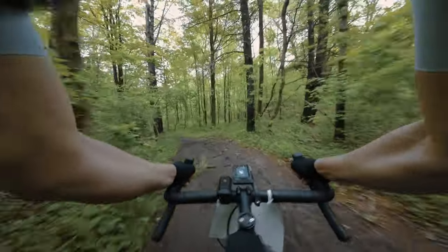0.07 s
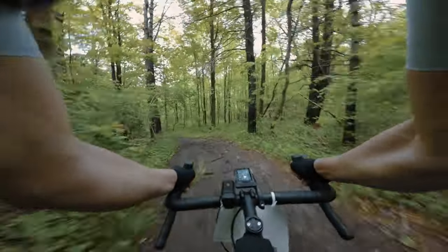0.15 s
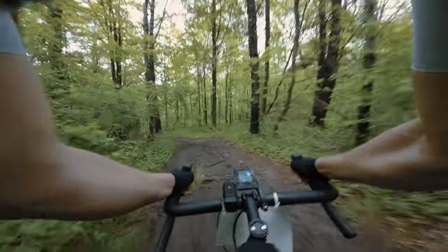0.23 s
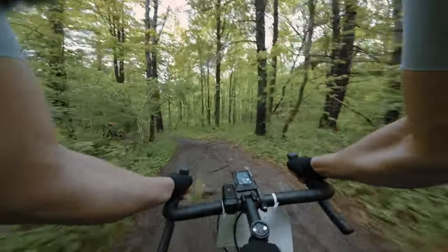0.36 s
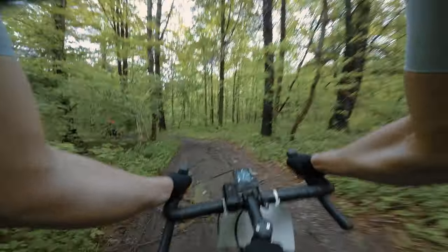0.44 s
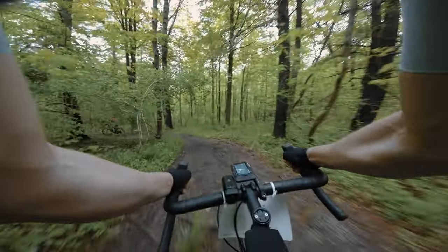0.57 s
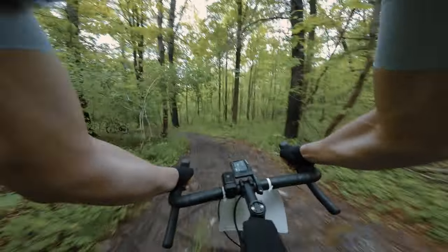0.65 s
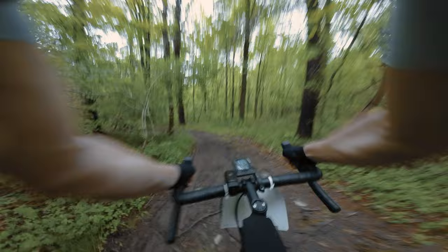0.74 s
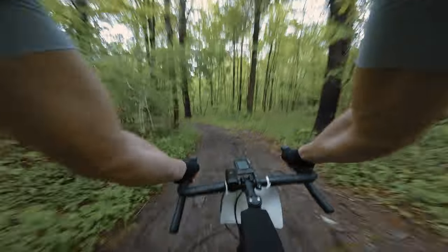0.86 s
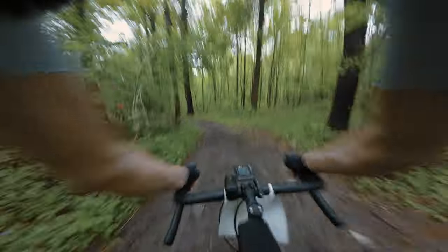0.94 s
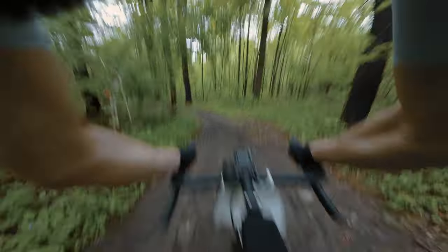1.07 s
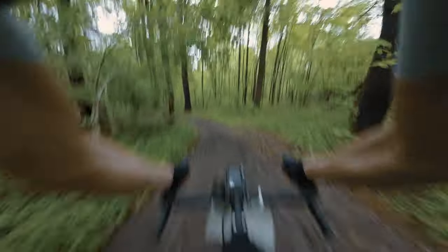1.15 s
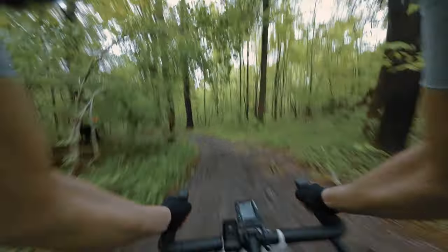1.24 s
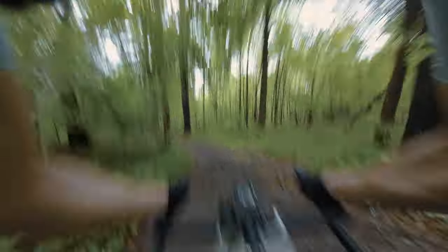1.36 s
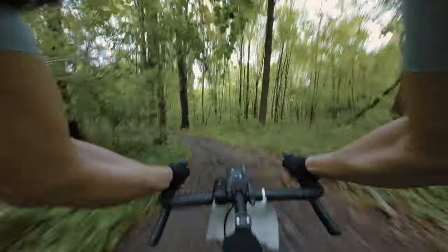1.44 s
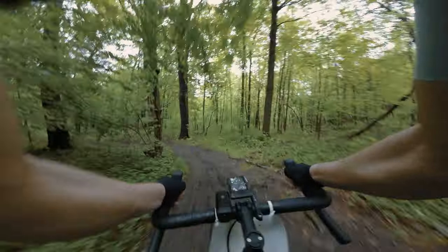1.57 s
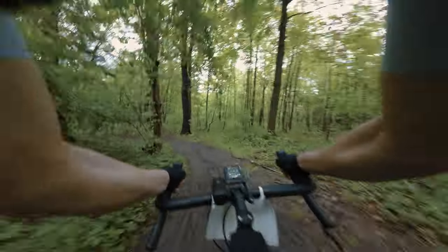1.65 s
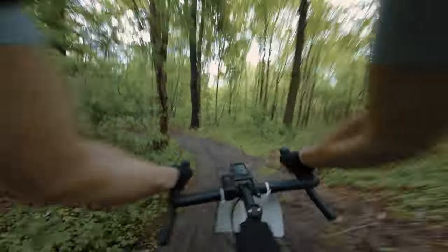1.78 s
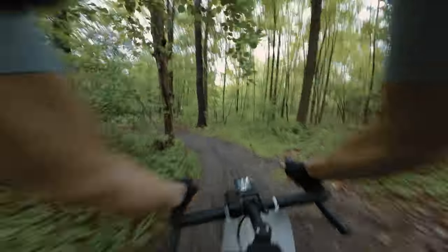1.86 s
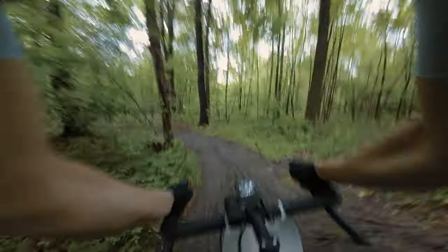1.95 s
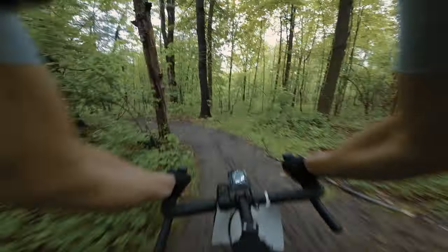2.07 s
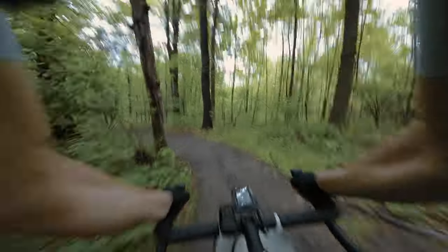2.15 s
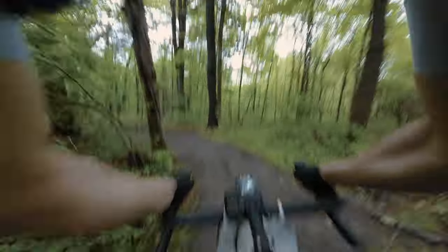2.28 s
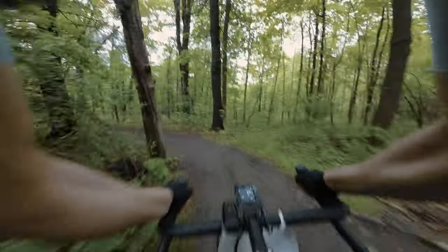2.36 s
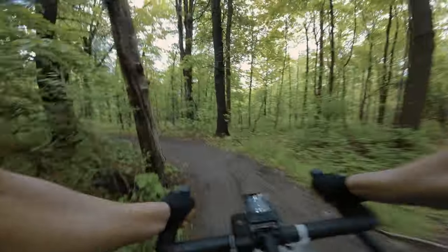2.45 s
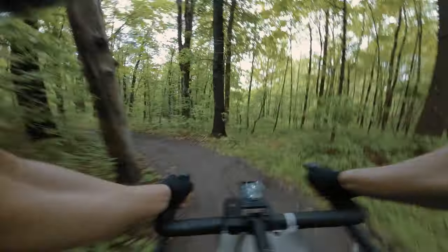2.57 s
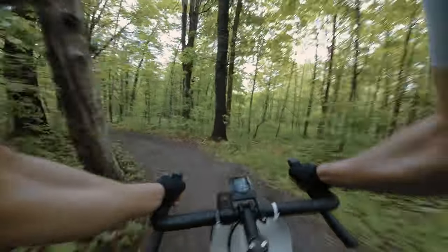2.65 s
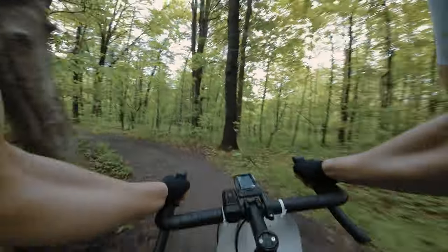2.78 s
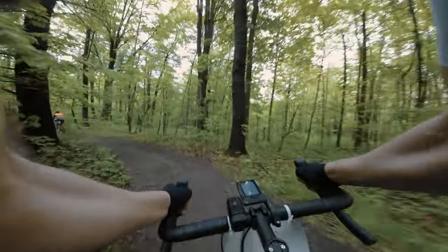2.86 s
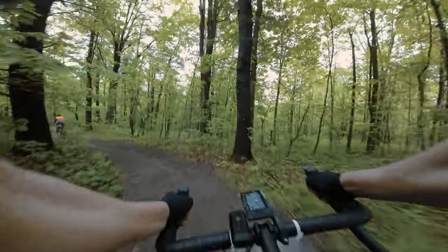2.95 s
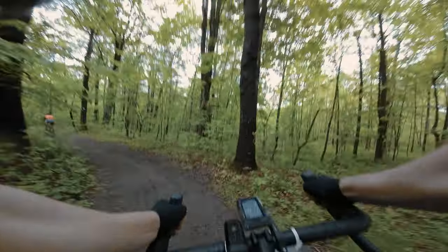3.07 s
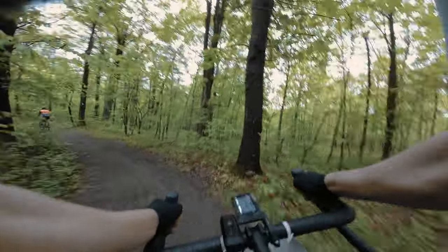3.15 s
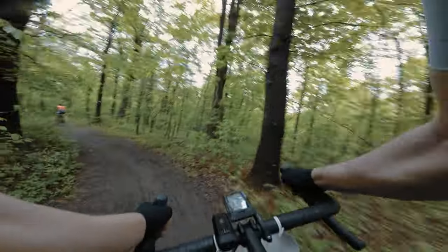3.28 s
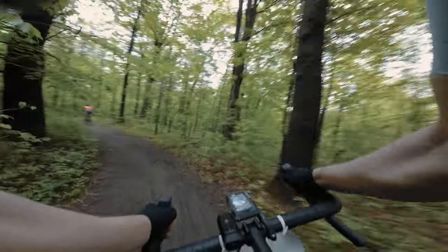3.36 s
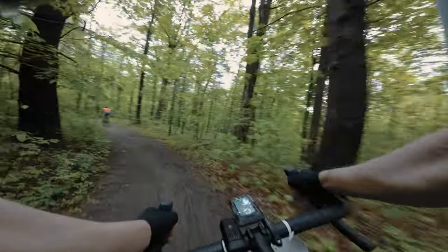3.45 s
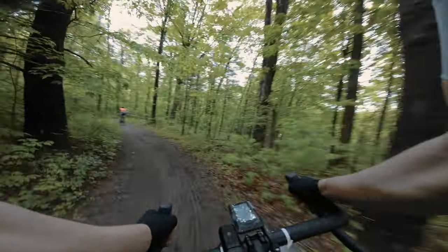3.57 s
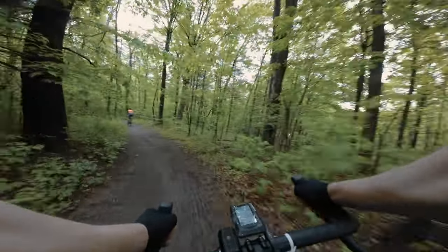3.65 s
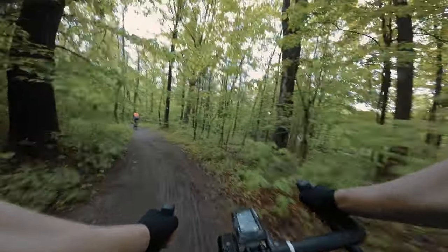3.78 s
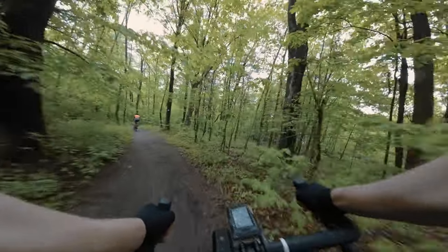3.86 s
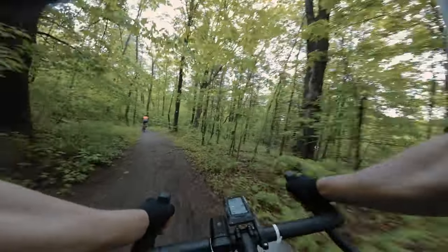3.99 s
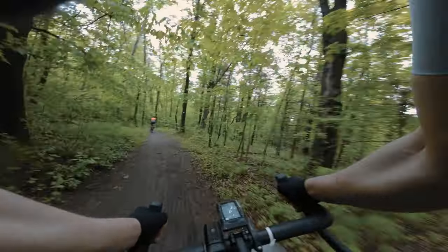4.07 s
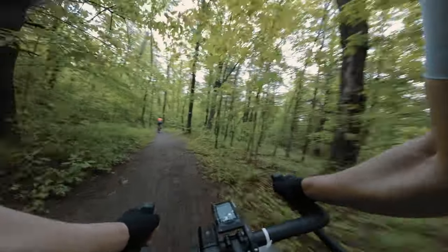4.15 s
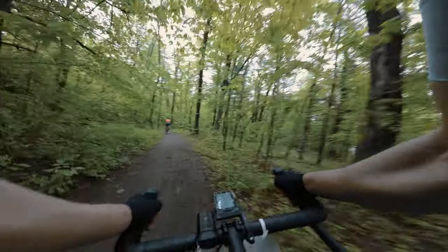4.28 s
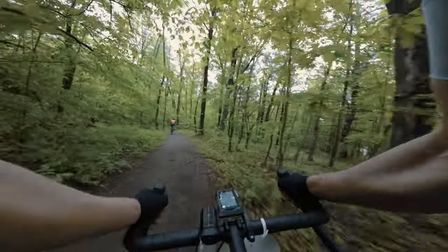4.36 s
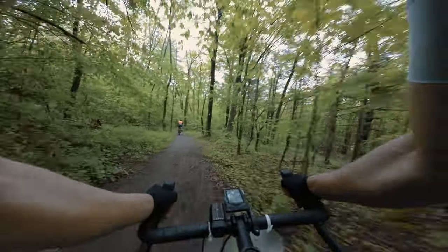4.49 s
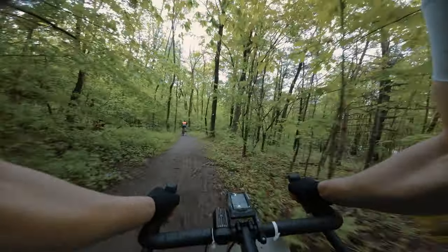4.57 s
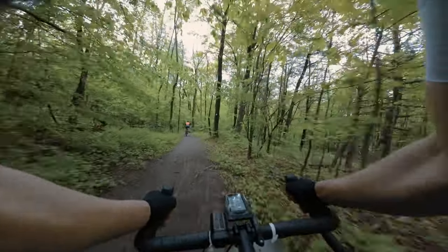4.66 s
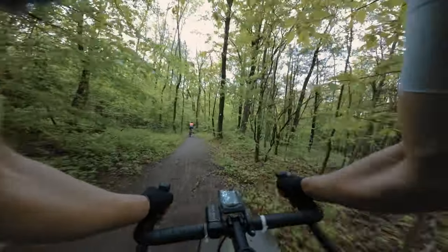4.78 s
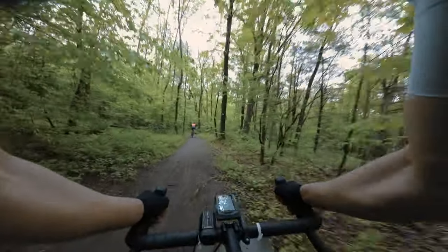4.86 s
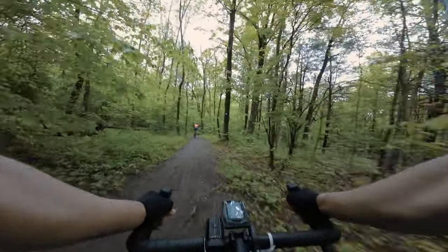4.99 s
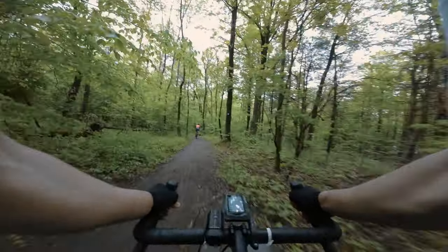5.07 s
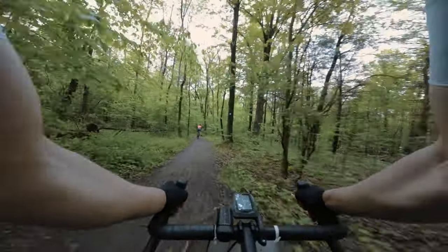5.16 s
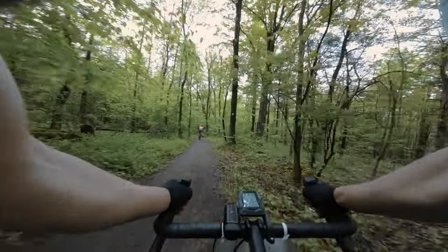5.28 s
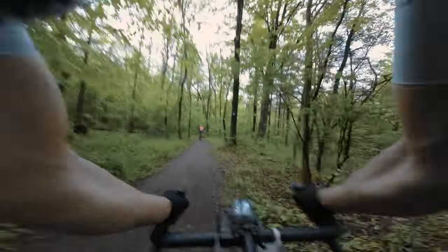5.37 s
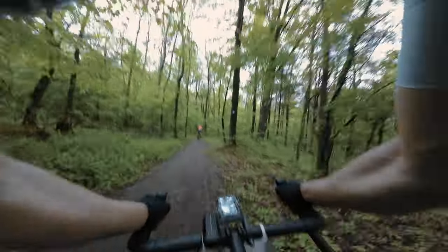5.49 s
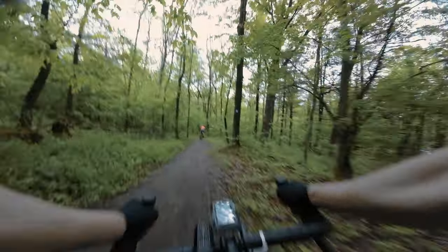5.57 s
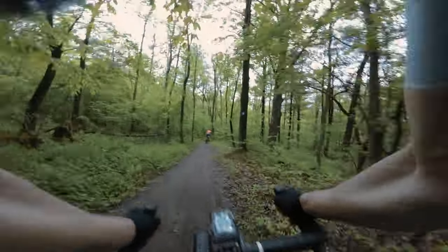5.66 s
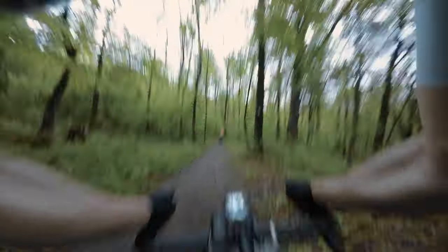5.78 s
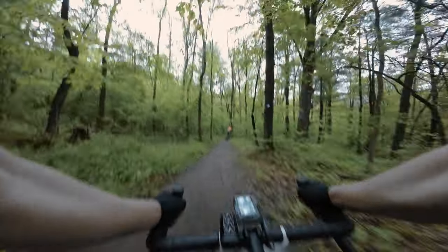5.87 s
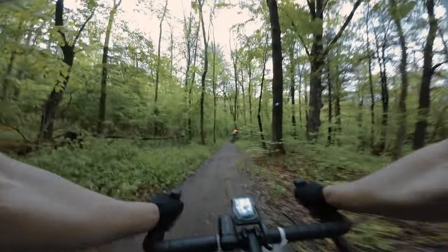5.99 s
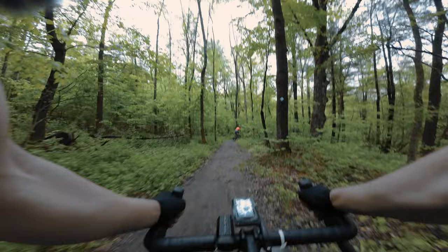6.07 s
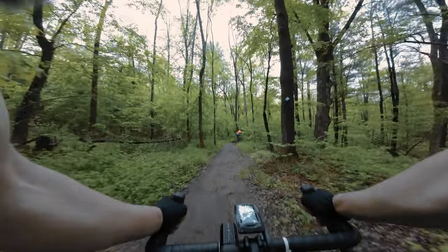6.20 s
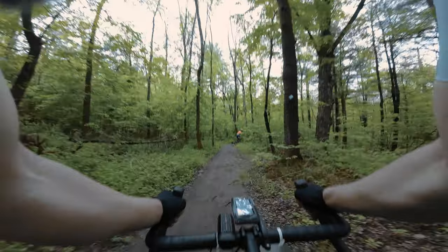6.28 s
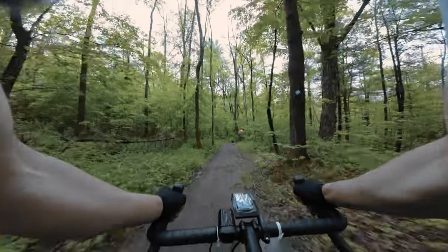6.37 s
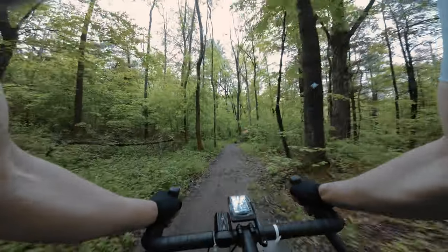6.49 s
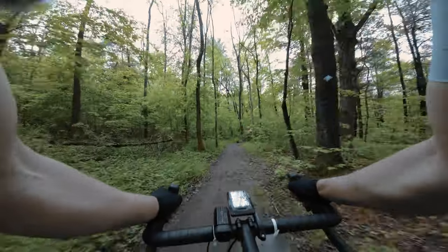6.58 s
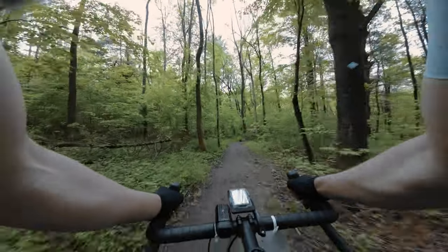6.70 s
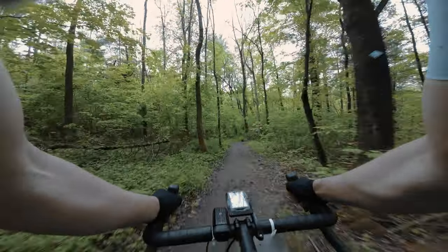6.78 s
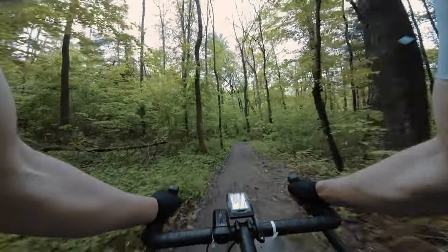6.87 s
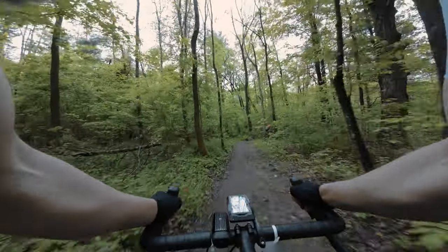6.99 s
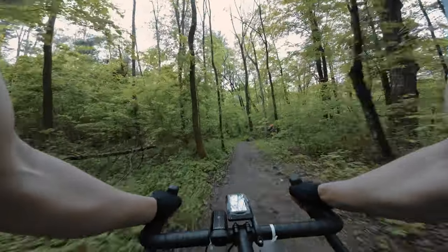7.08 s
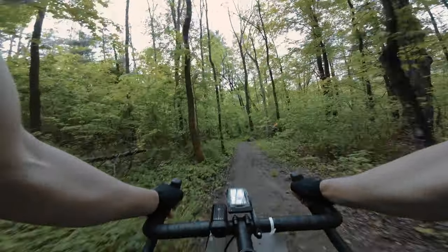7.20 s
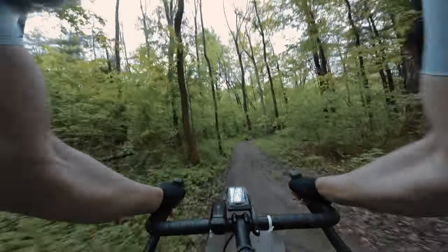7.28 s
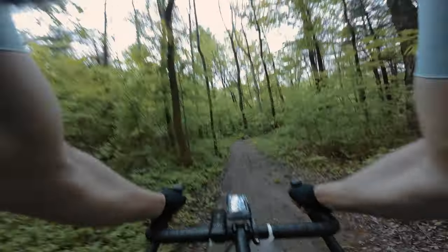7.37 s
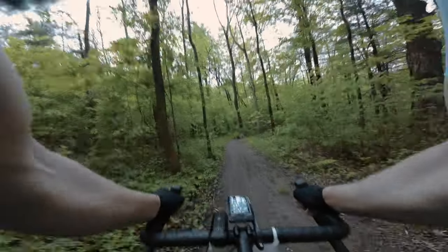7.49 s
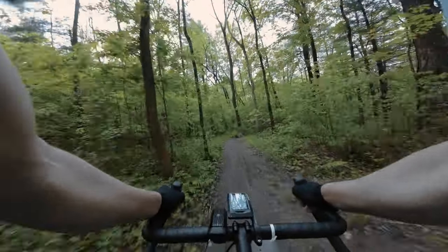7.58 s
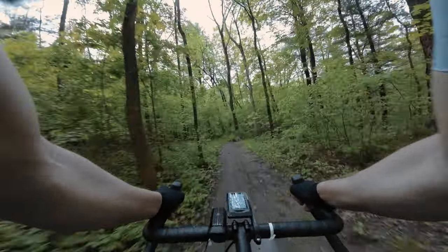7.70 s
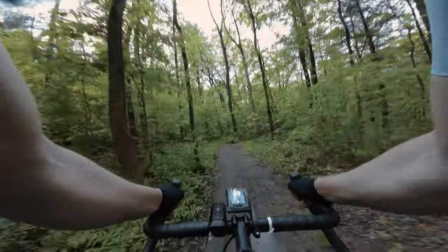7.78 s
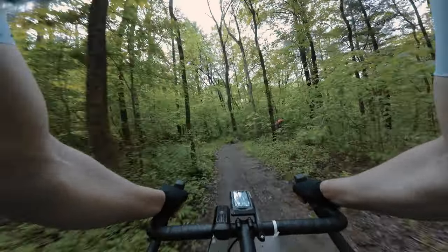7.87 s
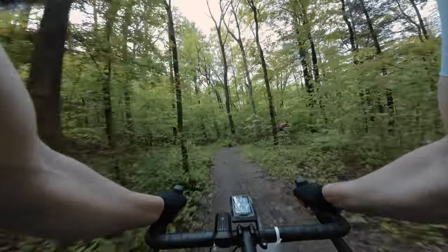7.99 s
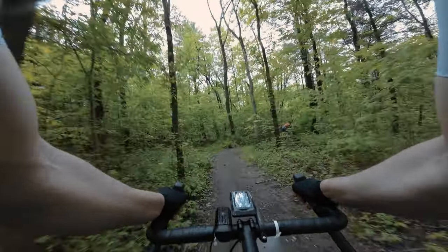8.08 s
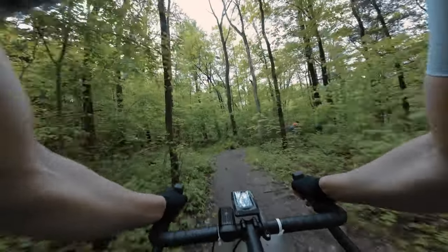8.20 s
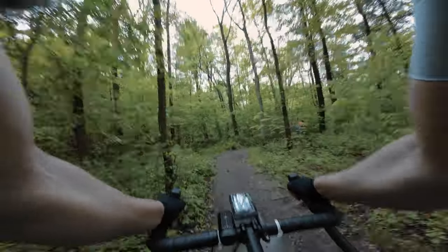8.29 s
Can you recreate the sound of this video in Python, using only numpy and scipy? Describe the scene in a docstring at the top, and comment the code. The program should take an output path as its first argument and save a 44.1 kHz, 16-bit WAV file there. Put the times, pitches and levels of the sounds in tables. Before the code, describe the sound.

A bike rushes down a dirt forest trail, tyres hissing and drumming, root knocks jolting the frame, wind buffeting, freehub buzzing, then calmer coasting.

```python
"""A bicycle runs fast down a dirt forest trail, heard by two microphone ports on the rider's chest.
At first the tyres hiss and drum (filtered noise), wind buffets, a thin bending tone whistles on and off,
and the coasting freehub buzzes (a rattle per ratchet tooth). Roots soon knock (noise bursts in a ringing frame).
Past 3 s the chain slaps and chatters; from 4.1 s the rider pedals and the buzz rests until about 5.8 s.
Then the bike coasts on with fewer jolts, and the whistle returns near the end; pebbles click now and then."""
import sys
import numpy as np
from scipy import signal
from scipy.fft import rfft, irfft, next_fast_len
from scipy.io import wavfile
from scipy.ndimage import uniform_filter1d

SR = 44100
rng = np.random.default_rng(int(sys.argv[2]) if len(sys.argv) > 2 else 0)


def generate_wav(signal):
    """Clip the signal to [-1, 1] and save it as 16-bit WAV at the path in sys.argv[1]."""
    frames = np.transpose(np.atleast_2d(signal))
    scaled = np.clip(frames, -1, 1) * 32767
    pcm = np.round(scaled).astype(np.int16)
    wavfile.write(sys.argv[1], SR, pcm)


N = 367789
TIME = np.arange(N) / SR  # s

# Levels in these tables are relative: the functions below scale them further.
# the ground under the tyres: [t/s, drumming level/dB, grit hiss level/dB]
TRAIL = [(0, -41, -45.5), (.65, -43, -46.5), (.95, -38, -48), (1.5, -31, -45.5), (1.85, -39.5, -46),
         (2.1, -37, -47.5), (2.3, -39.5, -42.5), (2.75, -39.5, -44.5), (3.05, -39.5, -46.5),
         (3.5, -36.5, -52.5), (3.95, -43, -51), (4.2, -42.5, -54.5), (5.2, -42, -53), (5.5, -38, -54),
         (6.05, -42.5, -53), (6.5, -44.5, -55), (7.35, -42, -53), (7.7, -42.5, -50), (8.34, -43, -51.5)]
# tone of the drumming: [f/Hz, level/dB]
DRUM = [(40, -2.5), (110, 6), (200, -1), (300, -1), (450, -2.5), (700, -7), (1000, -14), (1500, -17.5),
        (2500, -13.5), (6000, -48.5)]
# tone of the grit hiss: [f/Hz, level/dB]
GRIT = [(300, 0), (900, -2), (1500, 1), (2300, 3.5), (3200, 5.5), (4000, -0.5), (5200, 3), (6500, -1.5),
        (8000, -5), (11000, -9.5), (13000, -11), (15500, -12.5)]
# resonances of the grit hiss: [f/Hz, width/Hz, boost/dB]
GRIT_MODES = [(1660, 600, -0.5), (3500, 310, 3.5), (4150, 1700, -3.5), (6320, 350, 4), (10050, 820, 6.5)]
# roots and stones under the wheels, plus two small chain-link knocks near 3.3 s: # [t/s, thud level/dB, crunch
# level/dB, knock pitch f/Hz]
JOLTS = [(0.225, -31, -50, 330), (0.734, -25, -39, 234), (0.831, -22, -34, 425), (0.851, -13.5, -27, 617),
         (0.999, -16, -29.5, 170), (1.023, -16.5, -28, 360), (1.059, -16, -33, 425),
         (1.123, -14.5, -28.5, 920), (1.147, -14.5, -26, 396), (1.194, -17, -32, 560),
         (1.306, -12, -31, 554), (1.316, -6.5, -26.5, 485), (1.331, -12.5, -26, 530), (1.381, -9, -32, 620),
         (1.398, -21, -38, 441), (1.579, -11, -28, 228), (1.629, -23, -39, 336), (1.751, -22, -29, 410),
         (1.91, -14.5, -20.5, 269), (1.934, -14.5, -31, 232), (1.976, -24, -25.5, 842),
         (2.197, -9.5, -28.5, 584), (2.265, -17.5, -31, 170), (2.601, -27.5, -31, 326),
         (3.308, -29, -51, 900), (3.387, -30, -38, 950), (3.685, -28, -44, 160), (4.259, -21, -36, 704),
         (4.272, -22, -40, 546), (5.314, -31, -39, 200), (5.381, -25, -59, 430), (5.416, -18.5, -38, 280),
         (5.46, -26, -66, 401), (5.562, -34, -42.5, 375), (5.718, -16.5, -37, 335), (5.73, -30, -39, 334),
         (5.881, -26, -46, 277), (6.628, -26.5, -51, 330), (7.223, -28, -44, 360), (7.311, -27, -47, 358.7),
         (7.436, -26.5, -59, 340), (7.513, -27, -44, 571)]
# tone of the thuds: [f/Hz, level/dB]
THUD = [(50, 2), (140, -0.5), (300, -1), (600, -1), (800, -3), (1100, -18.5), (2000, -19), (5000, -47)]
# resonances of the frame: [f/Hz, width/Hz, boost/dB]
FRAME_MODES = [(332, 41, 7), (403, 60, 5.5), (543, 23, 4), (575.6, 20, 7.5), (1270, 200, 1)]
# tone of the crunching dirt: [f/Hz, level/dB]
CRUNCH = [(400, -9), (1200, 13.5), (2200, 11), (3200, 11), (4500, 4), (7000, -5.5), (11000, -10),
          (15500, -54)]
# spells of coasting, when the pawls pass the ratchet teeth: [start t/s, end t/s, slowing time of the pedals/s]
COASTS = [(-.5, 4.1, .05), (5.78, 8.5, .45)]
# pace of the ratchet with the pedals at rest: [t/s, teeth per second]
RATCHET_PACE = [(0, 60), (1.6, 63.7), (2.9, 68), (3.4, 52.7), (4.05, 42.7), (6.0, 72), (6.45, 48),
                (6.8, 64), (7.5, 53.4), (8.34, 59)]
# strength of the ticks at full speed: [t/s, level/dB]
TICKS = [(0, -49.5), (1.0, -51), (1.6, -47), (2.1, -51.5), (2.75, -48.5), (3.55, -51), (4.1, -53.5),
         (6.1, -52), (7, -52), (7.8, -51.5), (8.34, -51)]
# tone of the hub and rim: [f/Hz, level/dB]
HUB = [(200, -12), (400, 0), (600, -3), (900, -4.5), (1400, -10.5), (2000, -1.5), (3300, -3), (4100, 1),
       (5200, -3), (7000, -10), (8500, -4), (11000, -0.5), (12800, -1.5), (15500, -1.5)]
# resonances of the hub and rim: [f/Hz, width/Hz, boost/dB]
HUB_MODES = [(367, 85, 14), (433, 30, 19.5), (846, 160, 15), (1986, 95, 7.5), (2522, 168, 13.5),
             (3123, 247, 15), (3435, 240, 13), (7470, 400, 13.5), (9740, 410, 9)]
# nasal ring of the buzz, shifting as the rider moves over the bike: [t/s, f/Hz]
NASAL = [(0, 2340), (1.2, 2420), (1.6, 2040), (1.9, 2460), (2.35, 2320), (2.6, 1980), (3.6, 2090),
         (6.25, 1950), (6.4, 2263), (6.8, 2070), (7.5, 2220), (8.34, 2150)]
# chain slapping the stay: [t/s, level/dB, boosted pitch f/Hz]
SLAPS = [(3.2586, -25, 3150), (3.2707, -26, 3380), (3.57, -29.5, 2000), (3.6123, -35, 1210),
         (3.645, -39, 2200), (3.6925, -38, 2000), (3.752, -29, 2580), (3.7634, -34, 1001),
         (4.1852, -33, 1300), (4.2034, -31.5, 1210), (4.2727, -41, 2600), (4.4597, -35, 3620),
         (4.4783, -29.5, 2230), (4.5183, -38, 2600), (4.589, -44, 3300), (4.7197, -40.5, 3300),
         (5.2425, -38.5, 3380)]
# tone of the slaps: [f/Hz, level/dB]
CHAIN = [(200, -11), (600, 2.5), (950, 8.5), (1600, -1), (2300, 3.5), (2900, 3.5), (3400, 9), (3800, -3),
         (4500, -7), (8000, -28), (15500, -20)]
# resonances of the slapping chain: [f/Hz, width/Hz, boost/dB]
CHAIN_MODES = [(3080, 160, 6), (3630, 400, 7)]
# chain chattering over the sprockets, through the bend and while pedalling: [t/s, level/dB]
CHATTER = [(3.1, -56.5), (3.25, -47), (3.7, -41), (3.92, -61), (4.45, -45.5), (5.1, -50.5), (5.7, -57),
           (5.9, -50)]
# tone of the chatter: [f/Hz, level/dB]
SPROCKETS = [(300, -21), (600, -4.5), (1000, 1.5), (1400, -5.5), (2200, -10.5), (3300, -3), (4000, -17),
             (8000, -34)]
# pebbles flicked against the bike: [t/s, level/dB, boosted pitch f/Hz]
PEBBLES = [(0.745, -27, 11000), (1.3673, -22.5, 4500), (1.9136, -28.5, 4500), (2.6054, -22, 1500),
           (4.085, -46, 9000), (4.368, -38, 9000), (5.3797, -37, 2300), (5.43, -33, 11000),
           (5.5193, -26.5, 2700), (5.5653, -35, 1400), (5.7214, -33, 1600), (6.5545, -30, 4500),
           (7.5692, -24, 1479)]
# tone of the pebbles: [f/Hz, level/dB]
PEBBLE_TONE = [(600, -2), (2000, 4), (4800, 4), (7500, -4), (11000, -2), (15500, -12)]
# steady headwind at the ports: [t/s, level/dB]
HEADWIND = [(0, -37.5), (.7, -35.5), (2.2, -42), (2.6, -40), (4.1, -41), (4.6, -43), (5.3, -40.5),
            (7, -39.5), (8.34, -41.5)]
# gusts on top of it: [peak t/s, length/s, level/dB]
GUSTS = [(0.253, 0.36, -43), (0.906, 0.091, -24), (1.095, 0.11, -22.5), (1.343, 0.34, -26.5),
         (1.612, 0.057, -25.5), (1.97, 0.32, -29.5), (2.291, 0.29, -29), (2.83, .14, -33.5),
         (3.44, 0.22, -35.5), (4.99, .12, -36.5), (5.61, 0.47, -33), (5.89, 0.13, -26),
         (6.196, 0.13, -36.5), (6.605, 0.084, -44), (7.447, 0.28, -32)]
# tone of the large, slow eddies: [f/Hz, level/dB]
SWINGS = [(1, -26), (4, -9), (8, -4.5), (15, -1.5), (22, -10.5), (40, -23), (100, -100)]
# tone of the small, buffeting eddies: [f/Hz, level/dB]
BUFFET = [(10, -36), (24, -2), (40, -1), (62, -2), (100, -15.5), (160, -24.5), (300, -36.5), (1000, -92)]
# balance of the wind between the ports: [f/Hz, left minus right level/dB]
WIND_TILT = [(6, -12.5), (15, -7.5), (28, -2), (50, -6.5), (100, 6.5), (200, -11.5)]
# swells of the whistle: [start t/s, length/s, level/dB, pitch neared at full strength f/Hz]
WHISTLES = [(0, .07, -41, 6060), (.11, .2, -39, 6030), (.35, .05, -39, 6200), (.45, 0.065, -37, 6260),
            (.54, .07, -40, 6070), (.64, .14, -42.5, 5990), (.95, .055, -35, 6070),
            (1.63, 0.046, -38, 6300), (1.85, .075, -38, 6000), (2.21, 0.098, -44.5, 6260),
            (2.35, .11, -37.5, 5940), (2.47, .05, -41.5, 6130), (2.56, .08, -41, 6150),
            (2.82, .04, -43.5, 6330), (2.9, 0.072, -33, 6010), (3.02, 0.039, -36.5, 5990),
            (3.085, .035, -35, 6130), (3.15, .06, -42, 6410), (7.785, .26, -40.5, 5950),
            (8.06, .16, -35, 6047), (8.275, .1, -38.5, 6120)]
# spells of faint singing between the swells: [start t/s, length/s, level/dB]
WHISTLE_SPELLS = [(0, 1.02, -49.5), (1.4, .68, -52), (2.195, 0.88, -50.5), (7.735, 0.57, -47.5)]
# likeness of the sound at the two ports: [f/Hz, likeness from 0 to 1]
SAME = [(60, 1), (250, 1), (1000, 0.99), (2000, 0.98), (4000, 0.67), (8000, 0.23), (13000, 0.08)]
# colour of each port: [f/Hz, level/dB]
LEFT_PORT = [(1000, -2), (3000, -5.5), (4200, -4), (7000, 1), (10000, 1), (11400, 8), (12500, -4.5),
             (13800, -9.5), (15000, -3.5)]
RIGHT_PORT = [(1000, -2.5), (3000, -4), (4200, -0.5), (7000, 1.5), (10000, 1.5), (11000, 4.5), (12300, -14),
              (13600, -14), (15000, -4)]


def tyres(lumpy_db=2.0, patchy_db=0.52, load_db=1.5, grains_per_s=900, grain_db=3.0, grain_share=0.45):
    """Uneven ground drums through the frame while grains of dirt crack under the tread."""
    drum_db, grit_db = curves(TRAIL)
    ground = wander(hz=69)  # one roughness presses on both
    drum_level = np.hypot(amp(drum_db - 4.0), shaking()) * amp(lumpy_db * ground)
    drumming = rng.standard_normal((2, N)) * drum_level

    grain_starts = rng.random(N) < grains_per_s / SR
    grain_sizes = amp(grain_db * np.minimum(rng.exponential(1, N), 5)) * grain_starts
    grains = evened(grain_sizes * rng.standard_normal((2, N)))
    load = load_db * wander(hz=15)  # the hiss swells and sinks with the weight on the tyres
    grit_level = amp(grit_db - 1.5 + patchy_db * ground + load)
    grit = (rng.standard_normal((2, N)) + grain_share * grains) * grit_level

    soft_modes = [(hz, width, 0.2 * db) for hz, width, db in FRAME_MODES]  # rolling barely rings the frame
    drum_sound = radiate(drumming, DRUM, (180, 900), soft_modes)
    hiss = radiate(grit, GRIT, (4000, 5500), GRIT_MODES)
    return drum_sound + off_the_ground(hiss)


def shaking(lead_s=0.01, settle_s=0.039, shake_db=-18):
    """The frame drums harder as a tyre climbs a root, and settles afterwards."""
    t = TIME[:SR // 3] - .1  # begins 0.1 s before each jolt
    shape = np.exp(np.minimum(t / lead_s, -t / settle_s))
    power = np.zeros((1, N))
    for s, thud_db, _, _ in JOLTS:
        add(power, s + t[0], (amp(thud_db + shake_db) * shape[None]) ** 2)
    return np.sqrt(power[0])


def off_the_ground(x, delay_s=.002, sway=0.126, share=0.31):
    """A reflection off the ground, its delay wandering, sweeps a shallow comb through the sound."""
    when = TIME - delay_s * (1 + sway * wander(hz=1.57))
    echo = np.array([np.interp(when, TIME, channel) for channel in x])
    return (x + share * echo) / np.sqrt(1 + share ** 2)


def jolts(thud_gain_db=-6, crunch_gain_db=-4.0, focus_width_hz=150, focus_db=6, hard_db=-14, soften=0.33):
    """A tyre hits a root: the frame knocks, higher on sharp edges, duller on soft blows, and dirt crunches."""
    out = np.zeros((2, N))
    for s, thud_db, crunch_db, hz in JOLTS:
        modes = list(FRAME_MODES) + [(hz, focus_width_hz, focus_db)]
        fall = soften * max(hard_db - thud_db, 0)  # dB an octave above the pitch of the knock
        shape = [(f, db - fall * max(np.log2(f / hz), 0)) for f, db in THUD]
        thud = radiate(burst(rise=0.00054, decay=0.012, knock=0.9), shape, (200, 1500), modes)
        crunch = radiate(burst(rise=0.00063, decay=0.015, knock=0.096), CRUNCH, (1500, 5000))
        thud_part = amp(thud_db + thud_gain_db) * peaked(thud)
        crunch_part = amp(crunch_db + crunch_gain_db) * crunch
        add(out, s, thud_part + crunch_part)
    return out


def freehub(rise=0.001, decay=0.005, uneven_db=2.08, nasal=2.83, nasal_width_hz=190, rocking=.05,
            growth=0.67, snap=0.56, whirr=.06):
    """Pawls drop off ratchet teeth in short rattles that ring hub and rim, faster and louder as pedals stop."""
    t = TIME[:SR // 20]
    rattle = ((1 - np.exp(-t / rise)) * np.exp(-t / decay)) ** 2  # power of one tick
    pace, = curves(RATCHET_PACE)
    hub_db, = curves(TICKS)
    slip = np.zeros(N)  # 0 while pedalling, towards 1 with the pedals at rest
    for start, end, stop_s in COASTS:
        slip += (TIME < end) * (1 - np.exp(-np.maximum(TIME - start, 0) / stop_s))
    rate = pace * slip * (1 + rocking * wander(hz=5))  # the feet rock a little on the pedals

    teeth = np.floor(np.cumsum(rate) / SR)
    uneven = amp(uneven_db * rng.standard_normal(N)) ** 2
    drops = np.diff(teeth, prepend=0) * uneven * SR / np.maximum(rate, 1)
    power = signal.oaconvolve(drops, rattle / rattle.sum())[:N] + whirr  # the pawls also slide between drops
    level = np.sqrt(abs(power)) * slip ** growth * amp(hub_db - 2.0)
    drive = level * rng.standard_normal((2, N))
    firm_drop = uniform_filter1d(np.sqrt(drops), size=4)  # the first blunt drop of the pawls
    drive[0] += snap * firm_drop * slip ** growth * amp(hub_db)

    buzz = radiate(drive, HUB, (9000, 12000), HUB_MODES)
    ring_hz, = curves(NASAL)
    return buzz + nasal * resonate(buzz, ring_hz, nasal_width_hz)


def chain_slaps():
    """The chain slaps the stay: short blows with a weak lingering rattle."""
    return strikes(SLAPS, CHAIN, CHAIN_MODES, rise=0.00153, decay=0.00442, knock=0.38, tail_db=-19.5,
                   gain_db=2, focus_db=9, focus_share=0.15)


def chatter(links_per_s=90, mesh_db=2.0, loose_db=3.0, gain_db=-4):
    """Chain links seat on the teeth one after another, unevenly."""
    db, = curves(CHATTER)
    links = np.cumsum(links_per_s * (1 + 0.101 * wander(hz=3.4))) / SR
    seating_db = mesh_db * np.cos(2 * np.pi * links) + loose_db * wander(hz=50)
    level = during(CHATTER) * amp(db + gain_db + seating_db)
    return radiate(level * rng.standard_normal((2, N)), SPROCKETS, (700, 1400))


def pebble_clicks():
    """Flicked pebbles hit the bike: very short knocks, each with its own broad pitch."""
    return strikes(PEBBLES, PEBBLE_TONE, (), rise=0.00054, decay=0.0037, knock=0.7, tail_db=-32,
                   gain_db=-5.5, focus_db=8, focus_share=.7)


def wind(swing_gain_db=17.5, buffet_gain_db=3.5, heave=1.21, usual_db=-36):
    """Headwind and gusts drive both: large eddies heave slowly and grow faster; small ones buffet."""
    steady_db, = curves(HEADWIND)
    gust_power = sum(amp(db) ** 2 * swell(s, length) for s, length, db in GUSTS)
    force = np.sqrt(amp(steady_db) ** 2 + gust_power)
    swing_level = amp(usual_db + swing_gain_db) * (force / amp(usual_db)) ** heave
    swings = swing_level * eddies(SWINGS, likeness=-0.16)
    return swings + amp(buffet_gain_db) * force * eddies(BUFFET, likeness=0.27)


def eddies(shape, likeness):
    """Turbulent pressure, mostly stronger on the right; below 0 likeness the ports tend to move oppositely."""
    size = next_fast_len(N)
    f = np.fft.rfftfreq(size, 1 / SR)
    a, b = rfft(rng.standard_normal((2, size)))
    c = np.clip(likeness, -1, 1)
    z = np.array([a, c * a + np.sqrt(1 - c ** 2) * b])
    tilt_db = np.outer([.5, -.5], read(WIND_TILT, f))
    x = evened(irfft(z * amp(read(shape, f) + tilt_db), size)[:, :N])
    slow_power = uniform_filter1d(x.mean(0) ** 2, size=7000)
    return evened(x / np.sqrt(slow_power + 0.22))  # evens out chance swells


def swell(middle, length):
    """A smooth bell of height 1."""
    return np.exp(-np.minimum((2 * (TIME - middle) / length) ** 2, 50))


def whistle(rest_hz=6580, waver_hz=105, flutter_db=2.0, steady_db=-36, overtone_db=-20):
    """A thin tone, probably air over an edge: sharp and ragged when weak, flatter and steadier when strong."""
    swells = [(amp(db) * blown(start, length), hz) for start, length, db, hz in WHISTLES]
    faint = sum(amp(db) * blown(start, length) for start, length, db in WHISTLE_SPELLS)
    level = sum(push for push, _ in swells) + faint
    bend = sum(push * (rest_hz - hz) for push, hz in swells) / (level + 1e-9)
    hz = rest_hz - bend
    ragged = 1 / (1 + (level / amp(steady_db)) ** 2)
    gust = wander(hz=70)  # it flattens as it swells
    phase = 2 * np.pi * np.cumsum(hz - waver_hz * ragged * gust) / SR
    fuzz = wander(hz=170) * np.sin(phase) + wander(hz=170) * np.cos(phase)
    voice = np.sqrt(1 - ragged / 2) * np.sin(phase) + np.sqrt(ragged / 4) * fuzz
    voice += amp(overtone_db) * (1 - ragged) * np.sin(2 * phase)
    return level * amp(flutter_db * gust) * voice * amp([[.6], [-2.4]])  # left, right dB


def blown(start, length, rise_s=.012, fall_s=0.007):
    """Attack, hold and release of the whistle."""
    attack = 1 + np.tanh((TIME - start) / rise_s)
    release = 1 - np.tanh((TIME - start - length) / fall_s)
    return attack * release / 4


def strikes(rows, shape, modes, rise, decay, knock, tail_db, gain_db, focus_db, focus_share):
    """Short clattering blows on one part of the bike, coloured by where each one lands."""
    out = np.zeros((2, N))
    for s, db, hz in rows:
        focus = (hz, focus_share * hz, focus_db)
        blow = radiate(burst(rise, decay, knock, tail_db), shape, (0, SR), list(modes) + [focus])
        add(out, s, amp(db + gain_db) * peaked(blow))
    return out


def burst(rise, decay, knock=0, tail_db=-60):
    """One firm knock, a swarm of tiny impacts that dies away (times in s), and a weak lingering rattle."""
    t = TIME[:SR // 4]
    shape = (1 - np.exp(-t / rise)) * (np.exp(-t / decay) + amp(tail_db) * np.exp(-t / 0.06))
    drive = shape / shape.max() * rng.standard_normal((2, len(t)))
    drive[0, np.argmax(shape)] += knock * np.linalg.norm(drive[0])
    return drive


def radiate(drive, shape, band, modes=()):
    """Rings a drive (shared, differing) through a body; white noise of rms 1 leaves rms 1 in the band/Hz."""
    size = 2 * next_fast_len(drive.shape[1] // 2 + 1)
    f = np.fft.rfftfreq(size, 1 / SR)
    db = read(shape, f) + sum(peak / (1 + (2 * (f - hz) / width) ** 2) for hz, width, peak in modes)
    cepstrum = irfft(np.log(amp(db)), size)
    cepstrum[1:size // 2] *= 2  # minimum phase: a body rings only after it is struck
    cepstrum[size // 2 + 1:] = 0
    body = np.exp(rfft(cepstrum))
    in_band = (f > band[0]) & (f < band[1])
    body /= np.sqrt(np.mean(abs(body) ** 2 * in_band))
    a, b = rfft(drive, size)
    same = np.clip(read(SAME, f), 0, 1)
    mid = a * np.sqrt((1 + same) / 2)
    side = b * np.sqrt((1 - same) / 2)
    return irfft(np.array([mid + side, mid - side]) * body, size)[:, :drive.shape[1]]


def resonate(x, hz, width):
    """Shifts the curve hz down to zero, smooths, and shifts back: a moving resonance of gain 1."""
    turn = np.exp(2j * np.pi * np.cumsum(hz) / SR)
    r = np.exp(-np.pi * width / SR)
    return 2 * (turn * signal.lfilter([1 - r], [1, -r], x / turn)).real


def peaked(sound):
    """Scales a short sound so that its loudest 5 ms have rms 1."""
    return sound / np.sqrt(uniform_filter1d((sound ** 2).mean(0), size=220).max())


def amp(db):
    """Decibels to gain."""
    return 10 ** (np.asarray(db) / 20)


def evened(x):
    """Scales to rms 1."""
    return x / np.sqrt(np.mean(x ** 2) + 1e-20)


def read(points, hz):
    """Reads a spectrum table on a log-frequency axis."""
    f, value = np.transpose(points)
    return np.interp(np.log(hz + 1), np.log(f + 1), value)


def curves(rows):
    """Each column of a table as a curve through time."""
    s, *columns = np.transpose(rows)
    return [np.interp(TIME, s, column) for column in columns]


def during(rows):
    """1 while a table lasts and 0 elsewhere, with soft edges."""
    inside = (TIME >= rows[0][0]) & (TIME <= rows[-1][0])
    return uniform_filter1d(1. * inside, size=300)


def wander(hz):
    """Smooth chance of rms 1, changing up to roughly hz times a second."""
    size = next_fast_len(N)
    f = np.fft.rfftfreq(size, 1 / SR)
    smooth = rfft(rng.standard_normal(size)) * np.exp(-(f / hz) ** 2)
    return evened(irfft(smooth, size)[:N])


def add(mix, s, sound):
    """Adds a sound to the mix at time s."""
    part = mix[:, max(round(s * SR), 0):][:, :sound.shape[1]]
    part += sound[:, :part.shape[1]]


def scene():
    """Everything rides along with the microphone ports in open air, so the layers simply add."""
    bike = tyres() + jolts() + freehub() + chain_slaps() + chatter() + pebble_clicks()
    return bike + wind() + whistle()


def record(dry):
    """Each port colours the sound, the strongest peaks overload, and the band ends steeply at 15.9 kHz."""
    size = next_fast_len(N + 4096)
    f = np.fft.rfftfreq(size, 1 / SR)
    ports = amp([read(LEFT_PORT, f), read(RIGHT_PORT, f)])
    heard = irfft(rfft(dry, size) * ports, size)[:, :N]
    heard = heard / (1 + heard ** 8) ** (1 / 8)  # soft limit at 1
    lowpass = signal.firwin(511, 15900, window=("kaiser", 9), fs=SR)
    return signal.oaconvolve(heard, lowpass[None], "same")


dry = scene()
out = record(dry)
generate_wav(out)
```